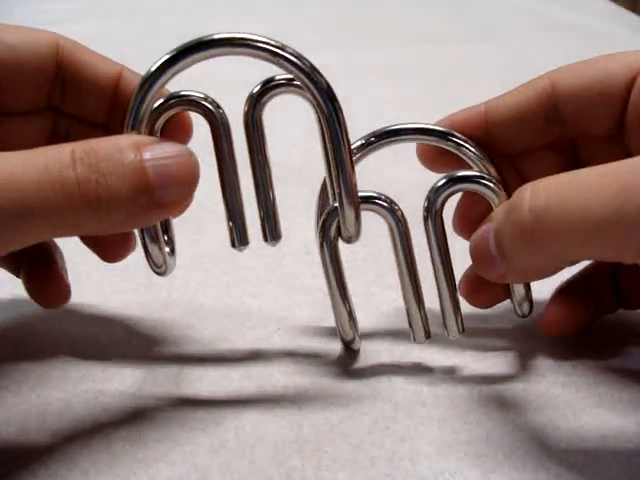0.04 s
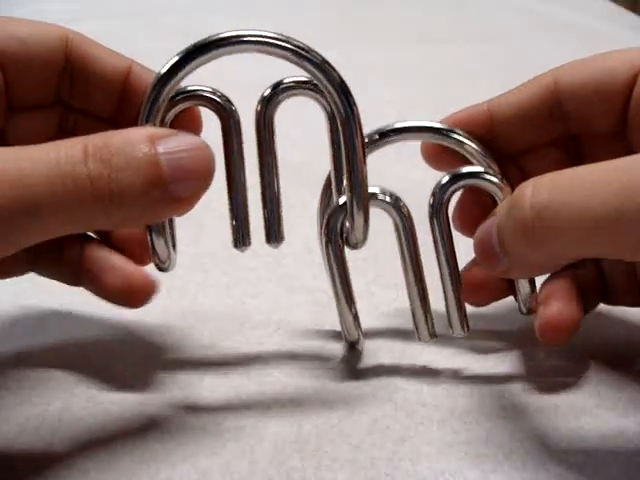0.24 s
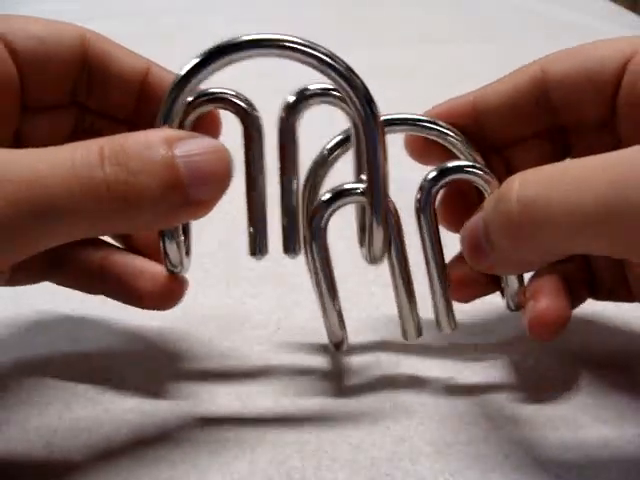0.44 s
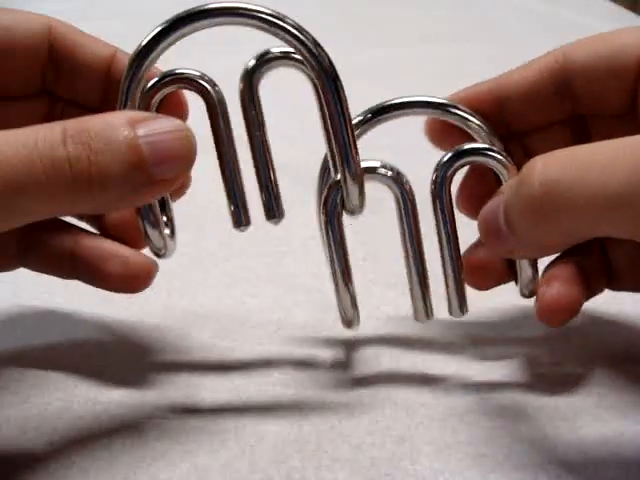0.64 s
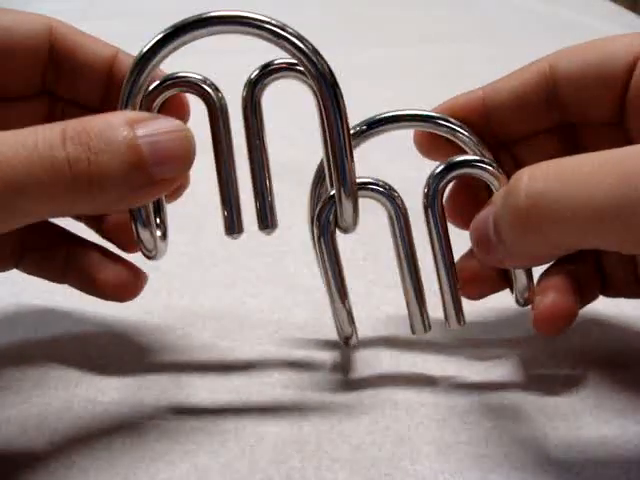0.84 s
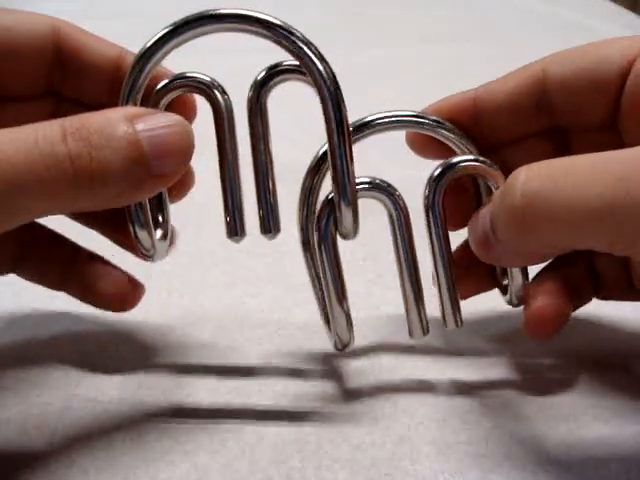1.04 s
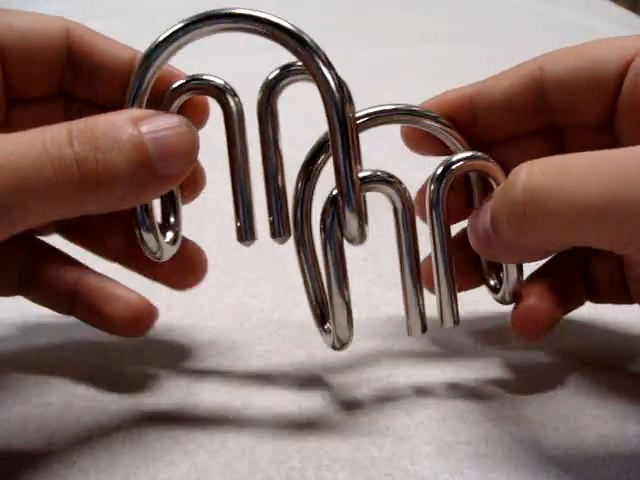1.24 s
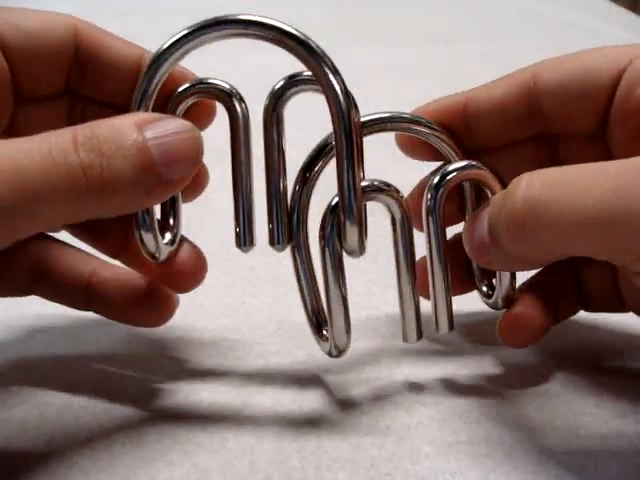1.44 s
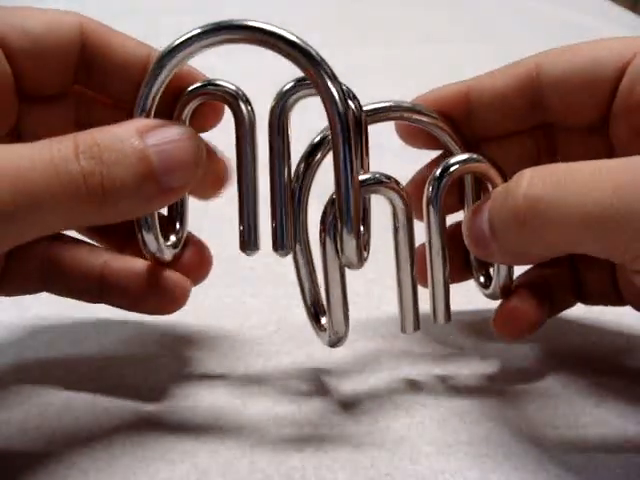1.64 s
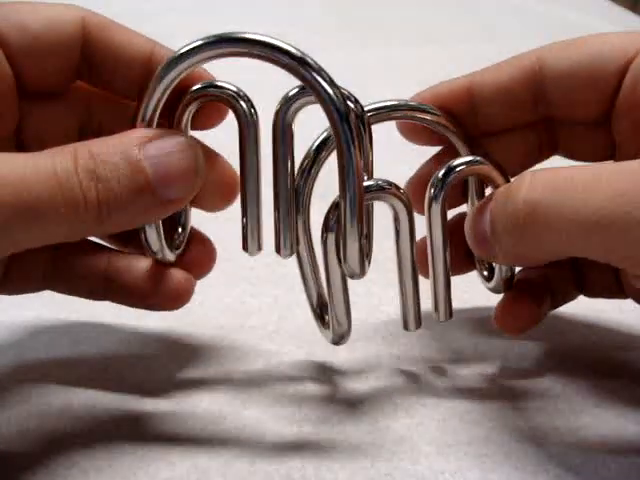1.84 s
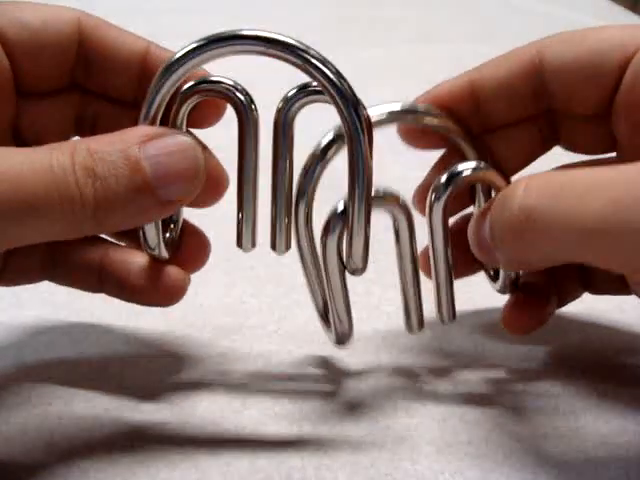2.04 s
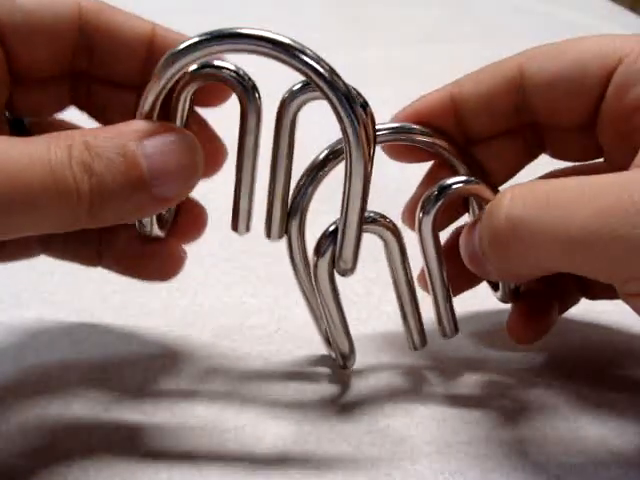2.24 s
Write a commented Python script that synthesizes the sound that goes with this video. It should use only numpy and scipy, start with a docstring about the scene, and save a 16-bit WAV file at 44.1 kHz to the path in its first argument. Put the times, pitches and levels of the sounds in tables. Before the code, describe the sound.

Two linked pieces of bent steel clink together in the fingers. A quick cluster of sharp, bright knocks comes first, then a pause and a few separate clinks, each ringing briefly. A faint fan hums in the small room.

```python
"""Two linked pieces of bent steel rod, held in the fingers over a table, knock together. Each knock
chatters for up to a few hundredths of a second, ringing the rods' high modes until the contact and
the fingers damp them, and a faint, diffuse ringing tail fades after the knocks. Behind them sit a short
reverb, a humming fan and microphone hiss. An automatic gain control ducks the mix on loud knocks."""
import sys
import numpy as np
from scipy import signal
from scipy.fft import rfft, irfft, next_fast_len
from scipy.io import wavfile
from scipy.ndimage import uniform_filter1d, map_coordinates

SR = 44100
rng = np.random.default_rng(int(sys.argv[2]) if len(sys.argv) > 2 else 0)


def digitize_waveform(pressure):
    """Quantize a signal to 16-bit integers and store it at the path in sys.argv[1].

    Rows of a 2-D input are taken as channels; values are limited to [-1, 1].
    """
    field = np.atleast_2d(pressure).T
    bounded = np.clip(field, -1, 1)
    quanta = np.round(bounded * 32767).astype(np.int16)
    wavfile.write(sys.argv[1], SR, quanta)


N = 101429


def amp(db):
    """Decibels to linear gain."""
    return 10 ** (np.asarray(db) / 20)


def unit(x):
    """Normalise to rms 1."""
    return x / np.sqrt(np.mean(x ** 2) + 1e-20)


def curve_db(points, hz):
    """Read an EQ curve of (frequency, level) points on a log frequency axis."""
    freqs, levels = np.transpose(points)
    return np.interp(np.log(hz + 1), np.log(freqs + 1), levels)


def bell(f, centre, width):
    """A resonant peak of height 1."""
    return 1 / (1 + (2 * (f - centre) / width) ** 2)


def filtered(x, response):
    """Zero-phase EQ; response gives the gain at each frequency."""
    m = next_fast_len(x.shape[-1] + 8192)
    return irfft(rfft(x, m) * response(np.fft.rfftfreq(m, 1 / SR)), m)[..., :x.shape[-1]]


def decay(impulses, t60_s):
    """Give each impulse an exponential tail."""
    return signal.lfilter([1], [1, -amp(-60 / (t60_s * SR))], impulses)


# Room tone EQ: (frequency [Hz], relative level [dB])
ROOM_TONE_EQ = [(15, -63), (25, -10), (95, -1.5), (135, -4), (170, -4.5), (267, -2), (380, -10), (465, -9),
                (554, -9.5), (1240, -14.5), (1560, -16), (2050, -17.5), (10300, -41), (13400, -64),
                (22000, -120)]
# Fan hum peaks: (centre [Hz], width [Hz], boost [dB])
FAN_PEAKS = [(42.6, 8.8, 6), (63, 13, -9), (90.7, 10.2, 6.5), (109, 11, 5), (213, 57, 3), (260.7, 20, 6),
             (341.6, 20, 7.5), (457.5, 19.5, 8), (1028.6, 27, 9.5), (1226, 170, 12.5)]
def fan():
    """A fan's hum: a low noise bed with broad peaks, slightly patchy across time and frequency."""
    spectrum = signal.stft(rng.standard_normal(N), nperseg=512)[2]
    patches = uniform_filter1d(rng.standard_normal(spectrum.shape), 4, axis=0)
    patches_db = unit(uniform_filter1d(patches, 12, axis=1))
    noise = signal.istft(spectrum * amp(patches_db), nperseg=512)[1][:N]
    hum_db = lambda f: sum(db * bell(f, hz, width) for hz, width, db in FAN_PEAKS)
    return amp(-39) * unit(filtered(noise, lambda f: amp(curve_db(ROOM_TONE_EQ, f) + hum_db(f))))


# Hiss EQ: (frequency [Hz], relative level [dB])
HISS_EQ = [(1180, -27), (2000, 10.5), (2390, -20), (2730, -12), (4760, -33), (10100, -0.5), (13100, -57),
           (22000, -120)]
def hiss():
    """The microphone's steady noise floor."""
    return amp(-68) * unit(filtered(rng.standard_normal(N), lambda f: amp(curve_db(HISS_EQ, f))))


def room(x, level_db=-28, t60_s=.35):
    """The room's reflections: a short, diffuse reverb tail."""
    t = np.arange(SR // 2) / SR
    tail = rng.standard_normal(len(t)) * amp(-60 * t / t60_s)
    predelayed = np.pad(x, (200, 0))
    return amp(level_db) * signal.fftconvolve(predelayed, tail / np.linalg.norm(tail))[:N]


# Ringing tail cues: (time [s], rms level [dB], decay T60 [s])
TAIL_CUES = [(.23, -77, .2), (.435, -42, 0.22), (0.459, -40.5, 0.19), (.60, -44.5, 0.75), (.65, -41, 0.14),
             (1.332, -56, 0.6), (1.70, -47, 0.64), (2.045, -42.5, 0.42)]
# Ringing tail EQ: (frequency [Hz], relative level [dB])
TAIL_EQ = [(2000, -35), (3000, 3), (3500, 0), (4700, 3), (5500, 1), (6500, -1), (8000, -1), (9000, -11),
           (10200, -9)]
def ring_tails(attack_s=.0056, flicker_per_s=300, flicker_db=1.5):
    """A faint, diffuse ringing tail fades after the knocks: noise coloured by the rods' modes."""
    t = np.arange(N) / SR
    envelope = sum(amp(db - 60 * np.maximum(t - start, 0) / t60) * np.clip((t - start) / attack_s, 0, 1)
                   for start, db, t60 in TAIL_CUES)
    flicker = map_coordinates(rng.standard_normal(int(N * flicker_per_s / SR) + 4), [t * flicker_per_s])
    resonance = lambda f: 1 + sum(amp(db - .5) * bell(f, hz, width=60) for hz, db in ROD_MODES)
    noise = filtered(rng.standard_normal(N), lambda f: amp(curve_db(TAIL_EQ, f)) * resonance(f))
    return envelope * unit(noise * amp(flicker_db * flicker))


def thud(time_s=.5672, peak_db=-14, width_s=.00016):
    """The hardest knock pushes the whole piece: one short, low pulse."""
    age = np.maximum(np.arange(N) / SR - time_s, 0) / width_s
    return amp(peak_db) * np.e * age * np.exp(-age)


def click(t, width_s=.00005, low_cut_hz=700):
    """The first push of a knock: a sharp, high-passed transient."""
    age = np.maximum(t, 0) / width_s
    return signal.lfilter(*signal.butter(2, low_cut_hz, 'high', fs=SR), np.e * age * np.exp(-age))


GRAZE_S = .0022  # the rods graze this long before they strike
def scrape(t, strikes, envelope, colour, level_db=-7, low_cut_hz=3000):
    """Contact noise: a graze leading in, a scrape under the chatter and a crack on every strike."""
    eq = lambda f: amp(curve_db(colour, f)) / (1 + (low_cut_hz / (f + 1)) ** 6)
    noise = filtered(rng.standard_normal(len(t)), eq) / 2
    graze = amp(-9.5) * (1 + t / GRAZE_S) * (t < 0)
    cracks = amp(-4) * decay(strikes, t60_s=.003)
    return (amp(level_db) * (graze + envelope) + cracks) * noise


# Ringing modes of the steel rods: (frequency [Hz], relative level [dB])
ROD_MODES = [(2760, -9), (3050, -8), (3300, -2), (3490, -4.5), (3700, -5), (4260, -7.5), (4430, -6),
             (4680, 1), (5350, 0), (5480, 4), (5780, -3), (6010, -3), (6370, 0), (6620, 2.5), (6940, -1),
             (7130, -0.5), (7330, -13), (7825, 2.5), (7955, 5), (8135, 2.5), (8290, -14), (8480, 3),
             (9700, -1.5), (9900, -44)]
def ring(t, strike_at, force, chattering, damping_db, colour, scatter_db=1.5):
    """The metallic ring: every strike kicks each mode anew at a random phase."""
    hz, mode_db = np.transpose(ROD_MODES)
    kicks = np.zeros((len(hz), len(t)), complex)
    kicks[:, strike_at] = force * np.exp(2j * np.pi * rng.random((len(force), len(hz)))).T
    swing = decay(kicks, t60_s=.059)
    swing /= np.sqrt(np.mean(abs(swing[:, chattering]) ** 2, axis=1, keepdims=True))
    gain = amp(mode_db + curve_db(colour, hz) + scatter_db * rng.standard_normal(len(hz)))
    damping = amp(damping_db * (hz[:, None] / 6000) ** 1.5)  # higher modes die faster
    modes = swing * gain[:, None] * damping * np.exp(2j * np.pi * hz[:, None] * t)
    return modes.real.sum(0) / np.sqrt(len(hz))


def chatter(t, length_s, fade_db, rough_db, colour, strikes_per_s=250, attack_s=.0012, damp_t60_s=.016):
    """The body of a knock: a strike and lighter re-strikes, until contact and fingers damp the rods."""
    gaps = -np.log(rng.random(39) + 1e-9) / strikes_per_s
    strike_s = np.concatenate([[0], np.cumsum(gaps)])
    force = amp((rough_db - 5) * (strike_s > 0)) * (strike_s < length_s)
    strike_at = np.minimum((strike_s + GRAZE_S) * SR, len(t) - 1).astype(int)
    strikes = np.bincount(strike_at, force, len(t))
    age = np.maximum(t, 0)
    chattering = (t >= 0) & (t < length_s)
    attack = 1 - np.exp(-age / attack_s)
    damping_db = -60 * np.maximum(t - length_s, 0) / damp_t60_s
    body = attack * ring(t, strike_at, force, chattering, damping_db, colour)
    body += scrape(t, strikes, attack * amp(rough_db + damping_db), colour)
    body *= amp(-fade_db * np.minimum(age / length_s, 1))
    return .5 * body / np.sqrt(np.mean(body[chattering] ** 2))


# EQ bands that colour each knock: (frequency [Hz])
COLOUR_BANDS = [3300, 4600, 5600, 6900, 8000, 9700]
# Knock cues: (time [s], level [dB], chatter length [s], fade over the chatter [dB],
# relative click level [dB], then one gain per colour band [dB])
KNOCK_CUES = [(.2035, -23, 0.011, 2.7, -12, -54, 13.5, -19, 0, 4.5, -55),
              (0.218, -28.5, 0.014, 2.4, -10, -0.5, 8, -12, -0.5, 0.5, -38),
              (0.4121, -12, 0.025, 4.3, 0.5, -4.5, 1.5, -3.5, -0.5, 1, -6),
              (0.436, -27, 0.013, 3, -34, 1, -6.5, -9, -6.5, -2, -12),
              (0.5416, -15, 0.0035, 5, -13, 4, 4.5, -7, 3, -1.5, 2.5),
              (0.546, -22.5, 0.0017, 1.5, -31, 3, -7, -17, -13.5, 5.5, -27.5),
              (0.546, -30, 0.018, 3.2, -27, 2, -3, -31.5, -37, -48.5, -37.5),
              (0.5635, -8.5, 0.0033, 1.5, -23, -12, -4, -22, -1, -4, -6),
              (.5672, -9, 0.029, 2.2, -18, -5.5, 2, -4.5, -0.5, 0, -4),
              (0.6179, -21.5, .012, 5.4, -31, -2, 3, -8.5, -1, 3, -11),
              (0.64, -40, 0.011, 5, -41, -1, 14, -6, -12, -15, -7),
              (0.7, -32.5, 0.01, 3.3, -29, -9, 4, -5, -0.5, 4, -35),
              (1.3025, -20.5, 0.014, 1.2, -12, -2.5, -0.5, 3.5, -5.5, 1.5, -21),
              (1.316, -29, 0.0027, 1.5, -30, 0, -2, -13, -14, -12, -6),
              (1.6771, -13, 0.0043, 9.9, -6.5, -6, 1, 2, -8.5, -7.5, 3),
              (1.681, -15.5, 0.02, 5.3, -14, -6.5, 1, -3.5, -12, -1, -9),
              (1.705, -38, 0.0088, 3.3, -31, 19, 3, -9, 6, -12, -21),
              (2.0208, -15, 0.02, 3.8, -7, -1.5, -2, 2, 0, 3, -6),
              (2.038, -17, 0.01, 19.5, -32, 4, 9, 3, 8, -6, -25),
              (2.187, -24.5, 0.0089, 1.9, -27, -5, 4, 3, 4, -0.5, -3),
              (2.198, -30.5, 0.0042, 3, -27, 6, -9, 5, -16, 1, -6)]
def knocks(hard_knock_db=-12):
    """The steel rods knock together: each hit is a click on top of a ringing chatter."""
    t = np.arange(SR // 8) / SR - GRAZE_S  # zero at the first strike
    track = np.zeros(N + SR)
    for time_s, level_db, length_s, fade_db, click_db, *band_db in KNOCK_CUES:
        rough_db = .5 * min(level_db - hard_knock_db, 0)  # soft knocks chatter and scrape less
        colour = list(zip(COLOUR_BANDS, band_db))
        hit = chatter(t, length_s, fade_db, rough_db, colour) + amp(click_db) * click(t)
        start = round((time_s - GRAZE_S) * SR)
        track[start:start + len(hit)] += amp(level_db) * hit
    return track[:N]


def scene():
    """Mono mix: knocks and their ringing tails up front, reverb, fan and hiss behind."""
    steel = knocks() + thud()
    return (steel + ring_tails() + room(steel) + fan() + hiss())[None]


def record(dry):
    """Automatic gain control ducks fast on loud peaks and recovers steadily; a steep high cut follows."""
    threshold_db, duck_share, release_db_per_s, high_cut_hz = -19.5, .69, 37, 10180
    power = abs(uniform_filter1d(dry ** 2, size=128, origin=63))
    over_db = np.maximum(10 * np.log10(power + 1e-12) - threshold_db, 0)
    release = release_db_per_s * np.arange(N) / SR
    duck_db = np.maximum.accumulate(duck_share * over_db + release, axis=1) - release
    duck_db = signal.lfilter([1 / 40], [1, 1 / 40 - 1], duck_db)  # attack of about 1 ms
    return filtered(dry * amp(-duck_db), lambda f: 1 / (1 + (f / high_cut_hz) ** 200))


dry = scene()
out = record(dry)
digitize_waveform(out)
```